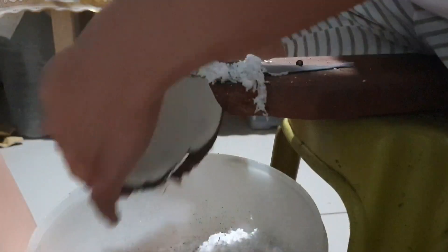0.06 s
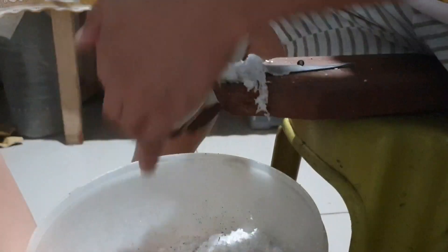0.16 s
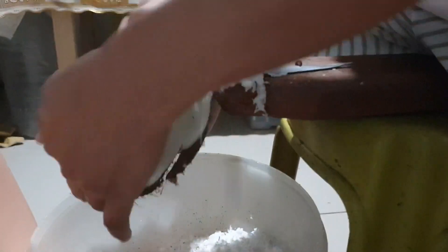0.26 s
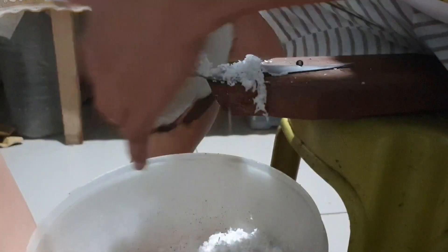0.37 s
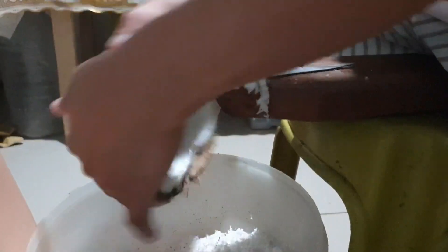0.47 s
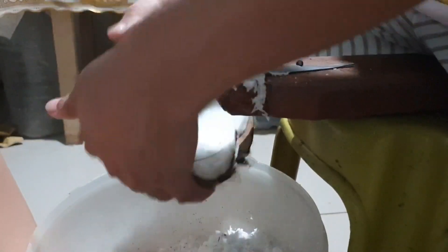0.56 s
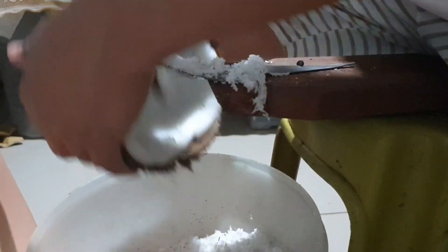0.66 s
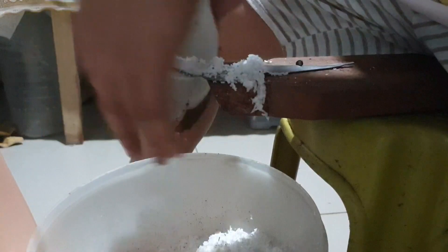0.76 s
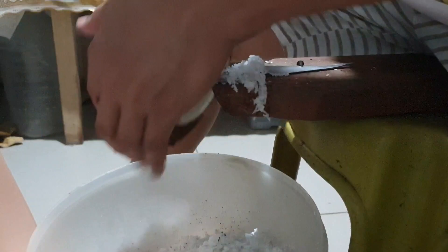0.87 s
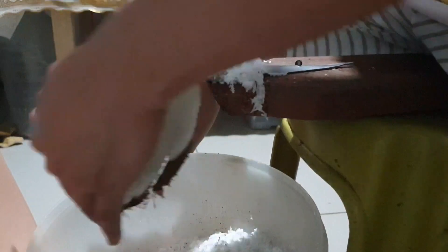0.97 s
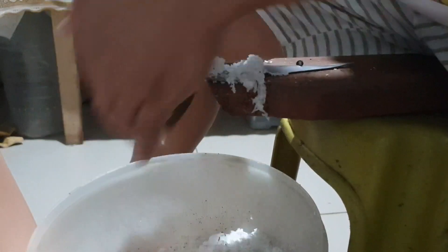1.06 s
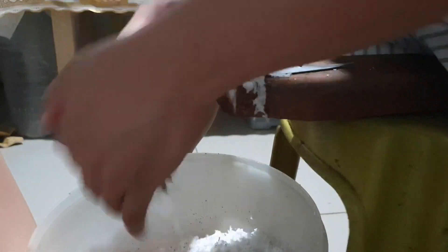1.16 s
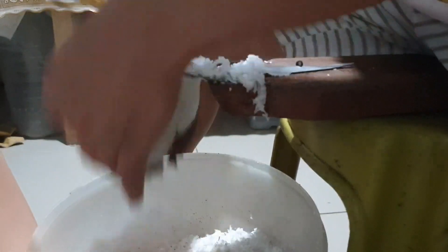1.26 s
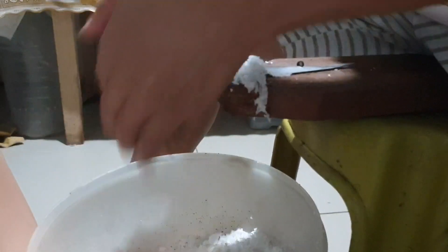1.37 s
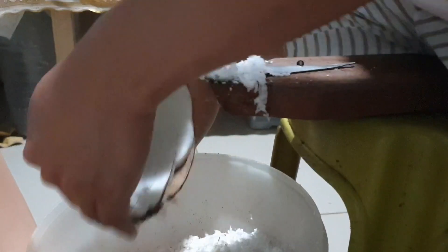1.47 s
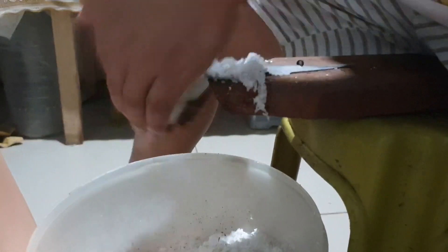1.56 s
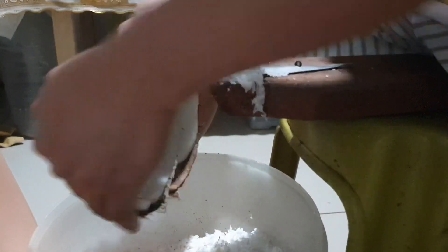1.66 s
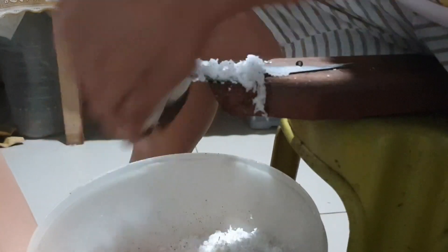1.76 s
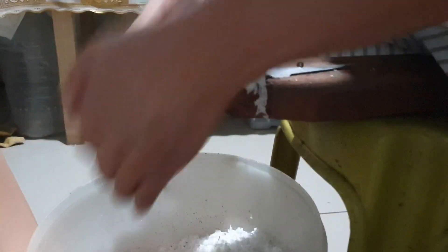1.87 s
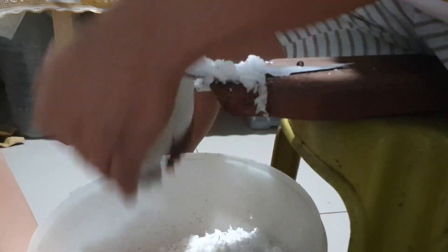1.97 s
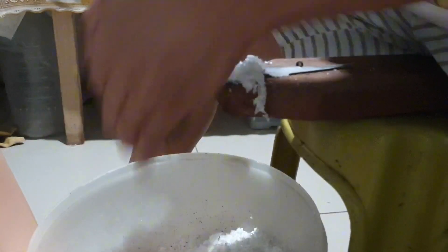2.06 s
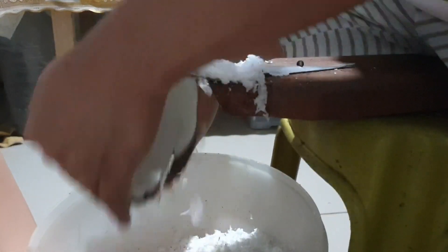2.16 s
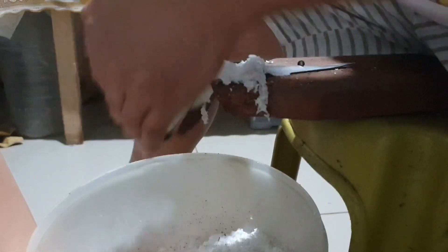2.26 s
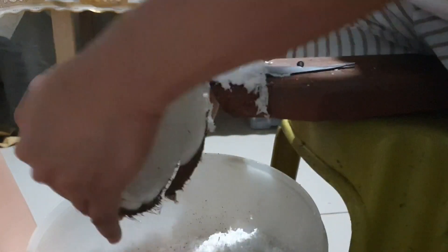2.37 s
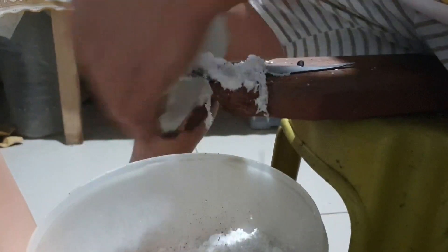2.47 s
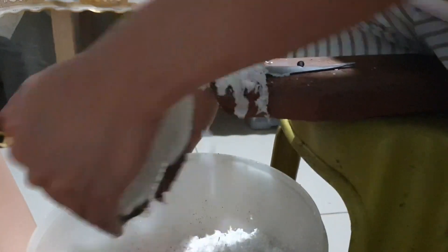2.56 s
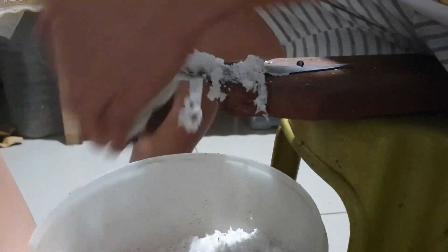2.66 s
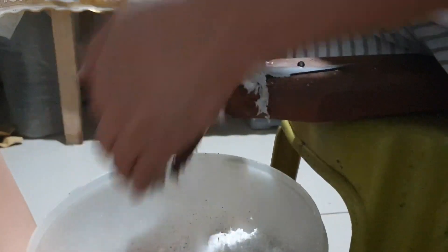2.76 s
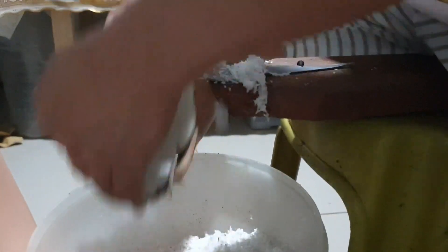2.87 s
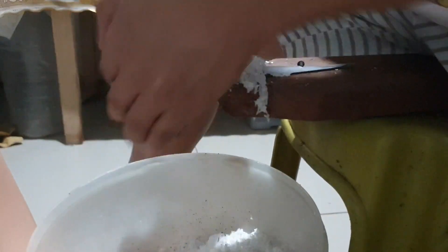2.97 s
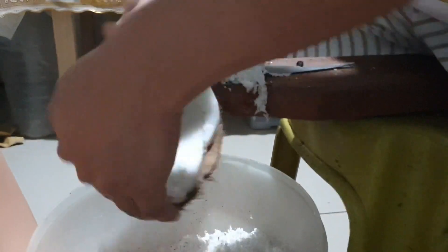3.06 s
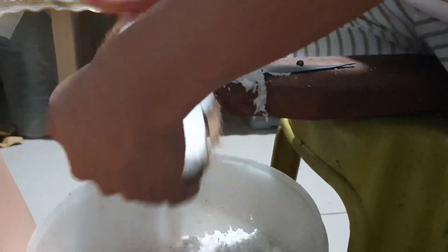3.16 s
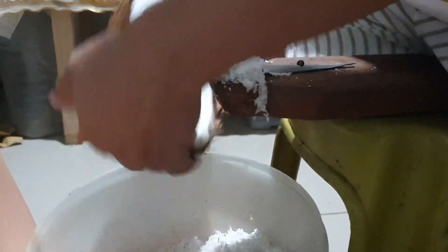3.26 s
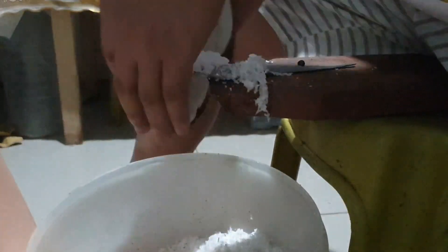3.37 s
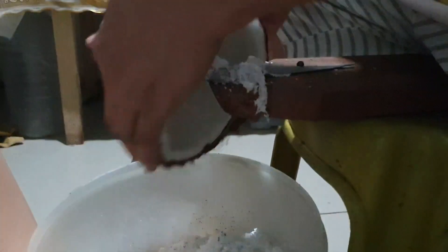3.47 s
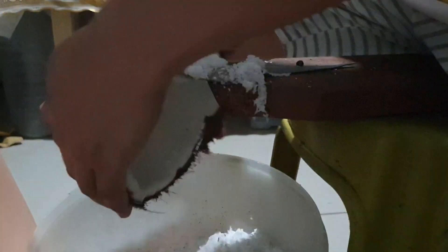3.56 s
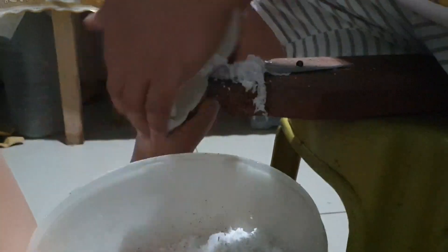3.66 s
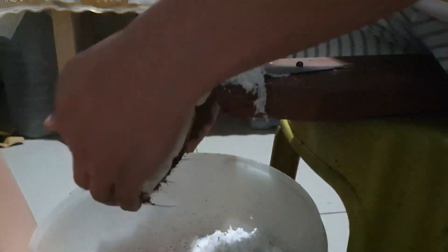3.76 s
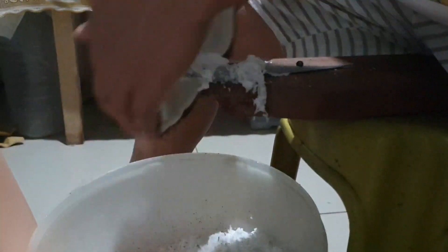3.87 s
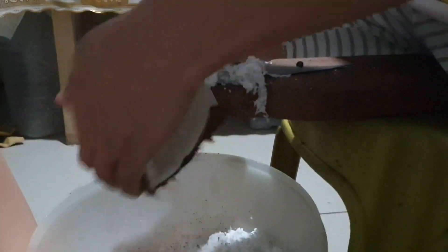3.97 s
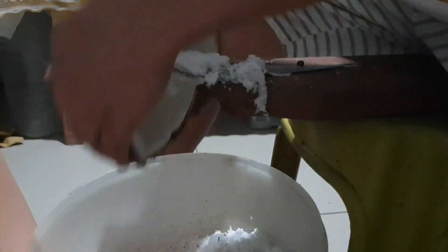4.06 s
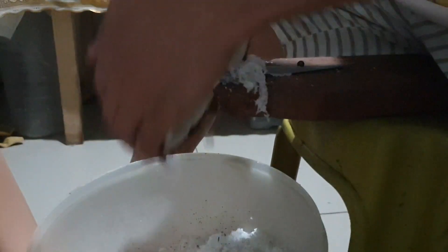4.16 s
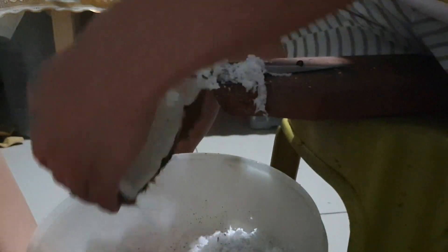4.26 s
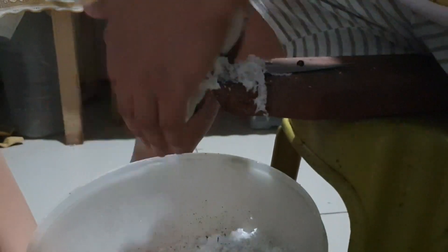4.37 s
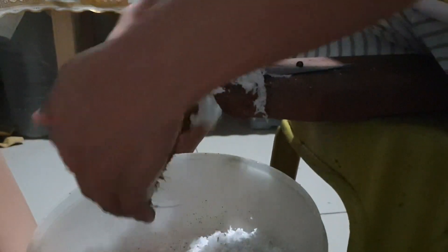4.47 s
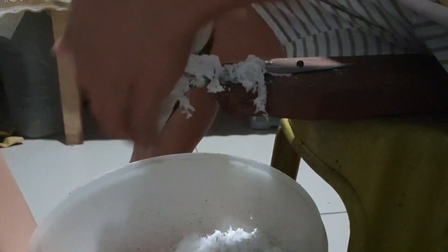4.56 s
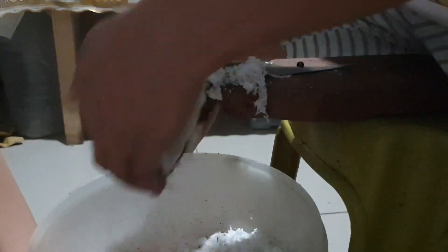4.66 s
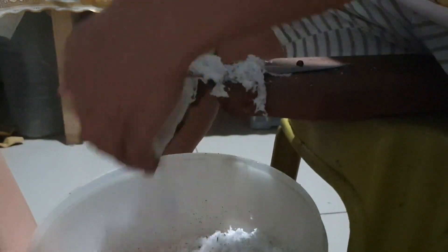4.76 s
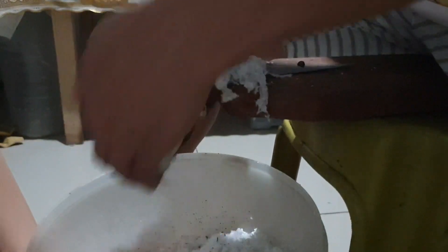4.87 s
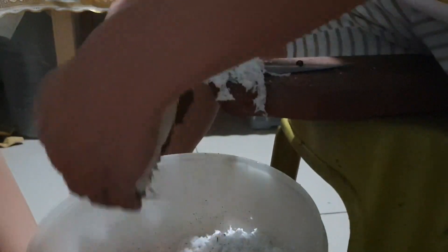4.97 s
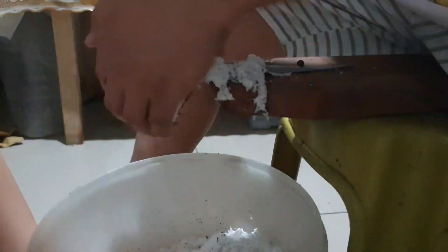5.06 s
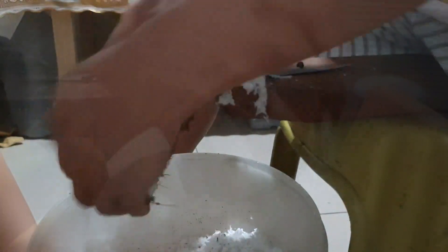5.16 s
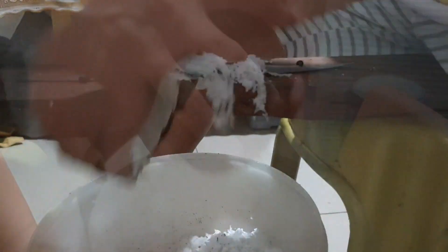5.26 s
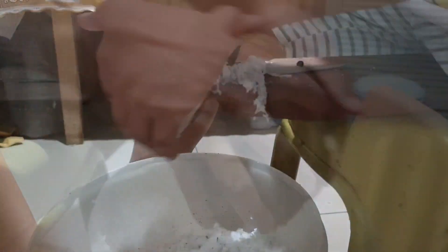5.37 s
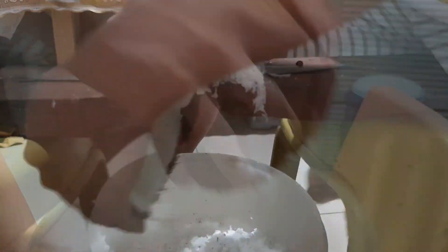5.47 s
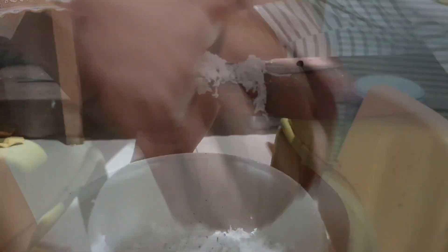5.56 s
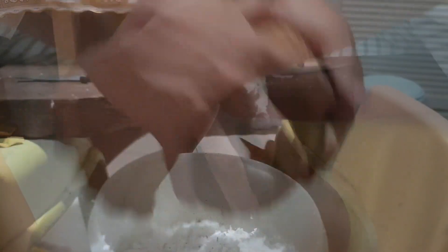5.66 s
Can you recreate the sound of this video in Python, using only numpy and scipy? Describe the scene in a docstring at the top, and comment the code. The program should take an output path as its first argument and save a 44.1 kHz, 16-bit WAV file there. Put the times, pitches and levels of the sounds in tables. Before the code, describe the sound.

Close, rhythmic grating of a coconut in a quiet kitchen, heard in wide stereo with little echo. Metal teeth bite into the flesh and rasp through it in short, quick pushes that shake the shell and a wooden bench. Sharp taps of shell on steel fall between the scrapes, along with lighter return drags. The rhythm hesitates twice and bunches up at the end, while a far engine drones very faintly.

```python
"""A kitchen bench: a coconut half is pushed in quick strokes over a steel grater fixed to the wood.
The teeth bite in with a thud, tear the flesh in a dense hiss of tiny rips and shake shell and bench.
Between strokes the shell taps the blade or drags lightly back, now and then with a squeak.
A kitchen hush and a far engine drone lie underneath; two spaced microphones give a wide image."""
import sys
import numpy as np
from scipy import signal
from scipy.io import wavfile

SR = 44100
rng = np.random.default_rng(int(sys.argv[2]) if len(sys.argv) > 2 else 0)


def digitize_waveform(pressure):
    """Quantize a signal to 16-bit integers and store it at the path in sys.argv[1].

    Rows of a 2-D input are taken as channels; values are limited to [-1, 1].
    """
    field = np.atleast_2d(pressure).T
    bounded = np.clip(field, -1, 1)
    quanta = np.round(bounded * 32767).astype(np.int16)
    wavfile.write(sys.argv[1], SR, quanta)


N = 251359

# tone of the kitchen hush: (frequency [Hz], relative level [dB])
HUSH_SPECTRUM = [(18, -39), (30, 2.5), (81, 10.5), (499, -3), (1070, -0.5), (2900, -7.5), (3490, -13.5),
                 (6720, -13.5), (8300, -96), (12600, -6), (16000, -42)]
# swells of the far engine: (time [s], length [s], start pitch [Hz], end pitch [Hz], level [dB])
ENGINE_SWELLS = [(0.953, 1.7, 54.5, 46.6, -55), (3.005, 1.5, 77, 76.8, -55), (4.894, 0.69, 77.5, 81, -54.5)]
# how alike the two microphones hear each pitch: (frequency [Hz], likeness [0-1])
MIC_LIKENESS = [(60, 0.68), (290, 1), (640, 0.27), (1400, 0.014), (15000, 0.015)]
# stereo balance: (frequency [Hz], left minus right [dB])
MIC_BALANCE = [(60, -7), (150, -8.5), (380, -4), (950, -4.5), (2380, -2), (5980, -5.5), (15000, 4.5)]
# bed of handling noise: (time [s], level [dB])
HANDLING_LEVELS = [(0.0, -67), (0.6, -53), (1.1, -62), (2.6, -50), (3.3, -56.5), (4.0, -54.5), (4.6, -62),
                   (5.3, -44), (5.7, -48)]
# pitched scratches on the way back: (time [s], length [s], level [dB], pitch [Hz], width [Hz])
RETURN_SQUEAKS = [(0.4, 0.023, -41.5, 2150, 400), (1.594, 0.042, -37, 4130, 2000),
                  (2.695, 0.013, -40, 2250, 250)]
# light drags back over the blade: (time [s], length [s], tearing [dB], shaking [dB])
RETURN_DRAGS = [(0.375, 0.18, -48.5, -49.5), (0.77, 0.053, -54, -57), (1.592, 0.075, -49, -41.5),
                (2.066, 0.037, -49, -45), (3.237, 0.03, -58, -58), (3.342, 0.056, -45.5, -45),
                (3.423, 0.14, -48.5, -49.5), (4.174, 0.031, -52.5, -42), (4.39, 0.053, -49.5, -63),
                (4.838, 0.051, -48.5, -48), (5.077, 0.11, -42, -37)]
# shell knocking on the blade: (time [s], level [dB], tick relative to knock [dB])
SHELL_TAPS = [(0.197, -21, -10.5), (0.23, -15.5, -15), (0.38, -43, -8), (0.669, -24.5, -15),
              (0.856, -30.5, -3), (0.862, -18, -23), (1.143, -25.5, -10), (1.377, -23, -14),
              (1.859, -25, -15), (2.065, -46, 3), (2.302, -31, -11), (2.524, -22.5, -18), (2.696, -37, -7),
              (2.998, -27, -22), (3.352, -39, -5), (3.717, -22.5, -12), (3.941, -22, -5), (4.645, -27, -13),
              (5.058, -28, -1), (5.302, -25.5, -29), (5.557, -29, -21)]
# pushes over the teeth: (bite time [s], contact ahead of bite [s], length [s], tearing [dB],
# brightness [dB], shaking [dB], bite [dB], hollow note of the shell [Hz])
PUSHES = [(0.004, 0.0069, .094, -31.5, -1.5, -28.5, -41, 515),
          (0.229, 0.0022, 0.084, -29, -2.5, -27.5, -42, 521),
          (0.467, .002, 0.059, -33, 6.5, -24.5, -20, 710),
          (0.931, 0.025, 0.14, -31.5, -3.5, -33.5, -46, 460),
          (1.172, 0.0057, 0.089, -28, -1.5, -26.5, -21, 498),
          (1.414, 0.0027, 0.077, -26.5, -2.5, -27.5, -17.5, 410),
          (1.655, 0.0038, 0.084, -29, -1.5, -29.5, -23.5, 460),
          (1.893, 0.0067, 0.076, -27.5, 1, -27.5, -16, 402),
          (2.121, 0.0066, .075, -30, 2, -31.5, -15.5, 280),
          (2.333, 0.0071, .09, -34.5, 7.5, -33.5, -47, 515),
          (2.562, 0.008, 0.092, -33.5, 4, -30.5, -18, 398), (2.81, 0.018, .091, -35, 6.5, -32.5, -23, 494),
          (3.031, 0.0031, 0.082, -34.5, 3, -31, -23, 380),
          (3.502, 0.0022, 0.13, -35, -0.5, -35.5, -22.5, 535),
          (3.745, .002, 0.1, -30.5, -5.5, -32, -22, 295), (3.978, 0.0048, 0.11, -31.5, .5, -28, -14.5, 530),
          (4.214, 0.0133, 0.1, -29, -.5, -28, -18.5, 492), (4.447, 0.0064, .095, -30, -1.5, -30, -20, 455),
          (4.68, .006, 0.094, -33.5, 2.5, -25, -17.5, 407),
          (4.912, .015, 0.1, -33.5, -1.5, -29.5, -21, 512), (5.158, 0.0023, 0.094, -36, 3, -24, -17, 500),
          (5.344, 0.0037, 0.11, -36.5, 1.5, -29.5, -44, 414),
          (5.442, 0.0034, 0.084, -31.5, -2.5, -33.5, -30, 465),
          (5.601, 0.012, 0.087, -33.5, -2.5, -27, -34, 433),
          (5.681, .004, 0.053, -31, -10, -24.5, -17.5, 230)]
# woody modes of shell and bench: (frequency [Hz], width [Hz], level [dB])
BODY_MODES = [(124, 47, -8.5), (164.6, 30.6, -2.5), (241.6, 32.7, -2.5), (343.7, 67, -1.5),
              (453.5, 45, -2.5), (540, 37, -3.5), (688.6, 19, -9), (800, 105, -11.5)]
# ring of the steel blade: (frequency [Hz], width [Hz], level [dB])
BLADE_MODES = [(1153, 31, -0.5), (1367, 61, -1), (1489, 34, 0.5), (1797, 14, 5), (2430, 85, -8),
               (2730, 48, -1), (2815, 69, 3), (3100, 470, -5)]
# short ring of the teeth: (frequency [Hz], width [Hz], level [dB])
TEETH_MODES = [(2280, 130, 4.5), (3020, 420, -2.5), (4680, 180, 0.5), (6540, 370, -1), (10900, 590, -11.5),
               (13800, 4400, -7)]
# tone of the tearing flesh: (frequency [Hz], relative level [dB])
TEARING_SPECTRUM = [(410, 2.5), (700, -0.5), (1040, -6), (1150, -7), (1870, -3.5), (2220, -7),
                    (2960, -13.5), (7290, -13), (8210, -20.5), (11800, -0.5), (16000, -35.5)]

HUSH_DB, ROOM_DB, KITCHEN_T60_S = -50.5, -8.5, 0.18
RIPS_PER_S, JUDDERS_PER_S = 9000, 540
BLADE_DB, BRIGHT_ABOVE_HZ = -7, 8500
HOLLOW_WIDTH_HZ, HOLLOW_DB = 35.4, 3
PUSH_SWELL_SHARE, PUSH_OPENING_DB, GENTLER_DB_PER_S = 0.45, -6.5, 302   # early contact starts softer
DRAG_SWELL_SHARE, DRAG_OPENING_DB, DRAG_BRIGHT_DB, DRAG_HOLLOW_HZ = 0.65, 3, 2, 301
AFTER_RUSTLE_DB, RUSTLE_FADE_DB_PER_S = -17, 118
LIFT_S, LIFT_DB = 0.036, -3.5   # the shell leaves the blade just before a tap
SNAP_DB, SNAP_ABOVE_HZ = 12.5, 2000   # bare crack of a tap
PORT_DIP_HZ, PORT_DIP_WIDTH_HZ, PORT_DIP_SHARE = 8340, 2900, 0.6
PORT_ROLL_OFF_HZ, CUTOFF_HZ = 12450, 16500


def from_db(db):
    """Decibels to gain."""
    return 10 ** (np.asarray(db, float) / 20)


def rms_one(x):
    """Scale to unit power."""
    return x / np.sqrt(np.mean(x ** 2) + 1e-20)


def at_hz(points, hz):
    """Read a curve on a log frequency axis."""
    frequencies, values = np.transpose(points)
    return np.interp(np.log(hz), np.log(frequencies), values)


def filtered(x, hz, kind):
    """Gentle low, high or band pass."""
    return signal.sosfilt(signal.butter(2, hz, kind, fs=SR, output="sos"), x)


def drift(rate_hz):
    """Smooth random modulation of unit power."""
    r = np.exp(-2 * np.pi * rate_hz / SR)
    return rms_one(signal.lfilter([1], [1, -2 * r, r * r], rng.standard_normal(N + 20000))[20000:])


def grains(per_s, spread_db):
    """Two click trains that share their timing and accents, each click with its own random size and sign on
    each side."""
    accents = from_db(spread_db * np.minimum(rng.exponential(1, N), 4))
    fires = rng.random(N) < per_s / SR
    return rms_one(accents * fires * rng.standard_normal((2, N)))


def stereo(pair, hz):
    """Mix a mid and side pair to left and right, as the microphones hear this pitch."""
    alike = at_hz(MIC_LIKENESS, hz)
    channels = np.sqrt(1 + alike) * pair[0] + np.sqrt(1 - alike) * pair[1] * [[1], [-1]]
    return channels * from_db(at_hz(MIC_BALANCE, hz) * np.array([[.5], [-.5]]))


def resonate(drive, modes, grip_db=0):
    """Parallel resonances with alternating signs; a changing grip favours now one mode, now another."""
    out = 0
    grip = drift(8.4) if grip_db else np.zeros(1)
    for k, (hz, width, level_db) in enumerate(modes):
        r = np.exp(-np.pi * width / SR)
        poles = [1, -2 * r * np.cos(2 * np.pi * hz / SR), r * r]
        favoured = drive * from_db(grip_db * np.roll(grip, k * SR // 3)) + 1e-18
        ring = signal.lfilter([1 - r * r, 0, r * r - 1], poles, favoured)
        out = out + (-1) ** k * from_db(level_db) * stereo(ring, hz)
    return out


def coloured(drives, spectrum, flicker_db):
    """Shape two alternating drives to a spectrum in half-octave bands, each flickering on its own."""
    out, edges = 0, 30 * 2 ** np.arange(0, 9.6, .5)
    flickers = drift(5.3), drift(11.2)
    for k, (low, high) in enumerate(zip(edges, np.minimum(edges[1:], .45 * SR))):
        hz = np.sqrt(low * high)
        if hz > spectrum[0][0]:
            band = filtered(drives[k % 2], [low, high], "band")
            level_db = at_hz(spectrum, hz) + flicker_db * np.roll(flickers[k % 2], k * SR // 4)
            out = out + from_db(level_db) * stereo(band, hz)
    return rms_one(out)


def blows(hits, contact_s, side_gain):
    """A mid and side force pulse for each (time, level) hit; shorter contact sounds brighter."""
    impulses = np.zeros((2, N))
    times, levels_db = zip(*hits)
    impulses[:, [round(s * SR) for s in times]] = from_db(levels_db) * [[1], [side_gain]]
    impulses[1] *= rng.choice([-1, 1], N)
    pulse = np.hanning(int(contact_s * SR) + 3)
    return signal.lfilter(pulse / pulse.sum(), [1], impulses)


def kitchen_hush():
    """Room tone: a soft, bass-heavy bed of noise."""
    return from_db(HUSH_DB) * coloured(rng.standard_normal((2, 2, N)), HUSH_SPECTRUM, flicker_db=2.5)


def far_engine():
    """A low hum that fades in, glides and dies away, wavering in pitch and level."""
    wobble, waver_db = 1 + 0.07 * drift(6.66), 2 * drift(6)
    t, drone = np.arange(N) / SR, 0
    for s, length_s, start_hz, end_hz, level_db in ENGINE_SWELLS:
        progress = np.clip((t - s) / length_s, 0, 1)
        fade = np.clip(np.minimum(progress, 1 - progress) / .18, 0, 1)
        swell = np.sin(np.pi / 2 * fade) ** 2
        turns = np.cumsum((start_hz + (end_hz - start_hz) * progress) * wobble) / SR
        drone = drone + from_db(level_db + waver_db) * swell * np.sin(2 * np.pi * turns)
    return stereo([drone, .4 * np.roll(drone, SR // 200)], 60)


def kitchen_reverb(x):
    """The room answers on each side with a short, slightly dull tail."""
    t = np.arange(int(.4 * SR)) / SR
    tail = rng.standard_normal((2, len(t))) * from_db(-60 * t / KITCHEN_T60_S) * (t > .006)
    tail = signal.lfilter([1], [1, -.3], tail)
    return signal.fftconvolve(x, tail / np.sqrt(np.sum(tail ** 2) / 2), axes=1)[:, :N]


def rustle_envelope():
    """Uneven handling, plus loose flesh rustling on after each push; both duck as the shell lifts."""
    t = np.arange(N) / SR
    level = from_db(np.interp(t, *np.transpose(HANDLING_LEVELS)))
    for s, _, _, peak_db, *_ in PUSHES:
        level += (t > s) * from_db(peak_db + AFTER_RUSTLE_DB - RUSTLE_FADE_DB_PER_S * np.abs(t - s))
    for s, *_ in SHELL_TAPS:
        lift = (t < s) * np.clip(1 - (s - t) / LIFT_S, 0, 1) ** .5
        level *= from_db(LIFT_DB * lift)
    return level * from_db(5.2 * drift(29))


def squeaks(rips):
    """Scratches on the way back: rips sing through one resonance under a smooth swell."""
    out = np.zeros((2, N))
    for s, length_s, level_db, hz, width in RETURN_SQUEAKS:
        span = slice(round(s * SR), round((s + length_s) * SR))
        scratch = rms_one(resonate(rips[:, span], [(hz, width, 0)]))
        out[:, span] += from_db(level_db) * np.hanning(scratch.shape[1]) * scratch
    return out


def chatter(hits, decay_s):
    """A dry contact skips: each hit becomes a short dying burst of uneven clicks."""
    r = np.exp(-1 / (decay_s * SR))
    envelope = signal.lfilter([np.sqrt(1 - r * r)], [1, -r], np.abs(hits[0]))
    return envelope * grains(20000, spread_db=.8)


def shell_taps(knocks, ticks):
    """Hard shell on steel: the knock rings the blade, its gritty tick cracks and rings the teeth."""
    snap = from_db(SNAP_DB) * stereo(filtered(ticks, SNAP_ABOVE_HZ, "high"), SNAP_ABOVE_HZ)
    blade = from_db(17) * resonate(knocks, BLADE_MODES, grip_db=2)
    teeth = from_db(21.5) * resonate(ticks, TEETH_MODES, grip_db=.5)
    return snap + blade + teeth


def stroke_envelope(swell_s, fade_s, opening_db, fade_db):
    """A fast attack to the opening level, a ramp to unity, then an ever steeper fall."""
    t = np.arange(int((swell_s + 2 * fade_s) * SR)) / SR
    ramp_db = opening_db * (1 - t / swell_s)
    fall_db = fade_db * (np.maximum(t - swell_s, 0) / fade_s) ** 2.14
    return from_db(np.where(t < swell_s, ramp_db, fall_db)) * (1 - np.exp(-t / 0.0018))


def strokes(judders):
    """Pushes and drags give dull and bright tearing envelopes, a shaking force and the shell's note."""
    tearing, shaking, hollow = np.zeros((3, 2, N))
    pushes = [(max(s - lead_s, 0), length_s, PUSH_SWELL_SHARE,
               PUSH_OPENING_DB - GENTLER_DB_PER_S * lead_s, tear_db, bright_db, shake_db, hz)
              for s, lead_s, length_s, tear_db, bright_db, shake_db, _, hz in PUSHES]
    drags = [(s, length_s, DRAG_SWELL_SHARE,
              DRAG_OPENING_DB, tear_db, DRAG_BRIGHT_DB, shake_db, DRAG_HOLLOW_HZ)
             for s, length_s, tear_db, shake_db in RETURN_DRAGS]
    for s, length_s, share, opening_db, tear_db, bright_db, shake_db, hollow_hz in pushes + drags:
        at, swell_s, fade_s = round(s * SR), share * length_s, (1 - share) * length_s
        # the treble lingers; the shaking starts strong and dies first
        dull = stroke_envelope(swell_s, fade_s, opening_db, fade_db=-14)[:N - at]
        bright = stroke_envelope(swell_s, fade_s, opening_db, fade_db=-10)[:N - at]
        shake = stroke_envelope(swell_s, fade_s, 0.33 * opening_db, fade_db=-31)[:N - at]
        span = slice(at, at + len(dull))
        tearing[:, span] += from_db(tear_db) * np.array([dull, from_db(bright_db) * bright])
        drive = from_db(shake_db) * shake * judders[:, span]
        shaking[:, span] += drive
        # the grip sets the pitch of the hollow
        hollow[:, span] += resonate(drive, [(hollow_hz, HOLLOW_WIDTH_HZ, HOLLOW_DB)])
    return tearing, shaking, hollow


def rasp(dull_envelope, bright_envelope):
    """Tiny rips in the flesh hiss and ring the blade; the same grains feed rustle and squeaks."""
    rips = [grains(RIPS_PER_S, spread_db=-0.5), grains(RIPS_PER_S, spread_db=0.5)]
    flesh = coloured(rips, TEARING_SPECTRUM, flicker_db=2.5)
    hiss = flesh + from_db(BLADE_DB) * rms_one(resonate(rips[0], BLADE_MODES, grip_db=1))
    dull = dull_envelope * filtered(hiss, BRIGHT_ABOVE_HZ, "low")
    bright = bright_envelope * filtered(hiss, BRIGHT_ABOVE_HZ, "high")
    rustle = rustle_envelope() * flesh
    crunch = from_db(0.5 * drift(71))   # fibres give way in clumps
    return crunch * (dull - bright) + rustle + squeaks(rips[1])   # minus avoids a crossover notch


def grating():
    """Coconut on the grater: the flesh rasps while judders, bites and taps shake shell and bench."""
    judders = from_db(8.5) * grains(JUDDERS_PER_S, spread_db=1.5)
    tearing, shaking, hollow = strokes(judders)
    flesh = rasp(*tearing)
    bites = -blows([(s, bite_db) for s, *_, bite_db, _ in PUSHES], contact_s=.0015, side_gain=.2)
    knocks = blows([(s, db) for s, db, _ in SHELL_TAPS], contact_s=.00023, side_gain=.66)
    ticks = blows([(s, db + tick_db) for s, db, tick_db in SHELL_TAPS], contact_s=.00003, side_gain=0)
    ticks = chatter(ticks, decay_s=.0015)
    body = resonate(shaking + from_db(33) * bites + from_db(25) * knocks, BODY_MODES, grip_db=1.8)
    return flesh + body + hollow + shell_taps(knocks, ticks)


def scene():
    """The grating up front with a touch of room, over hush and engine."""
    work = grating()
    return work + from_db(ROOM_DB) * kitchen_reverb(work) + kitchen_hush() + far_engine()


def record(dry):
    """The microphone ports scoop a band of treble and roll off; the very top is cut."""
    lost = signal.lfilter(*signal.iirpeak(PORT_DIP_HZ, PORT_DIP_HZ / PORT_DIP_WIDTH_HZ, SR), dry)
    ports = filtered(dry - PORT_DIP_SHARE * lost, PORT_ROLL_OFF_HZ, "low")
    return signal.sosfilt(signal.cheby2(14, 70, CUTOFF_HZ, fs=SR, output="sos"), ports)


dry = scene()
out = record(dry)
digitize_waveform(out)
```